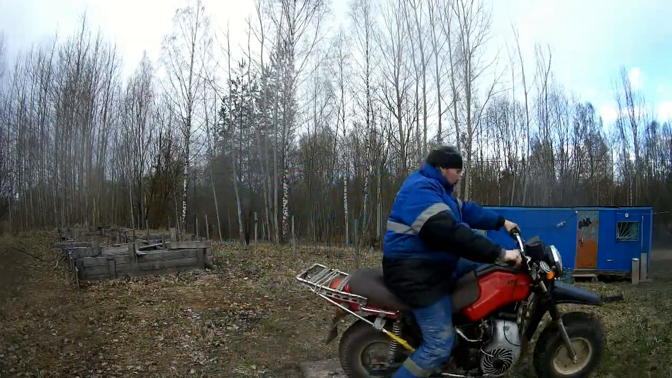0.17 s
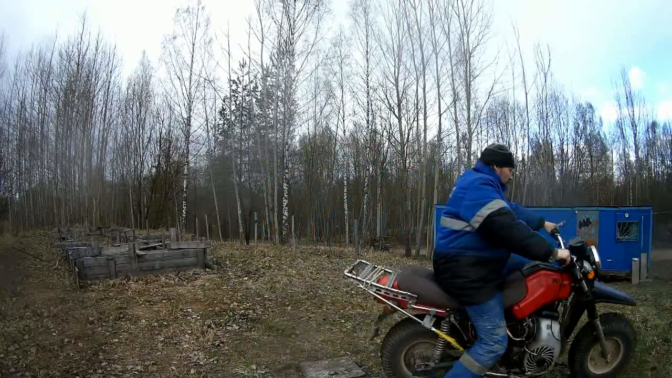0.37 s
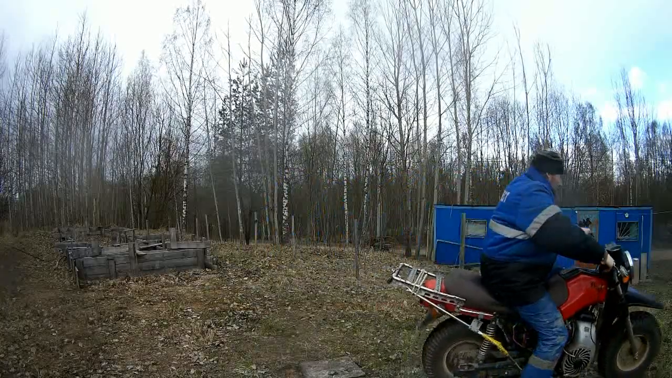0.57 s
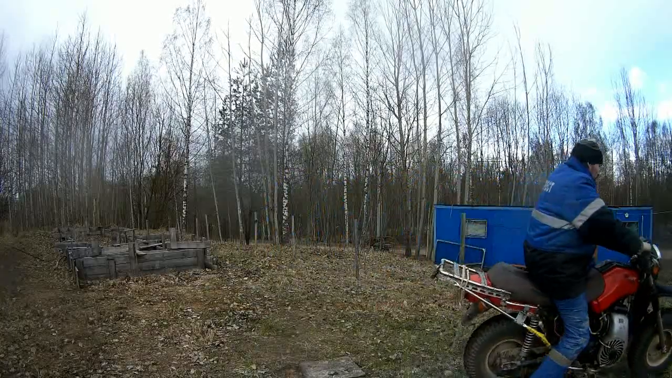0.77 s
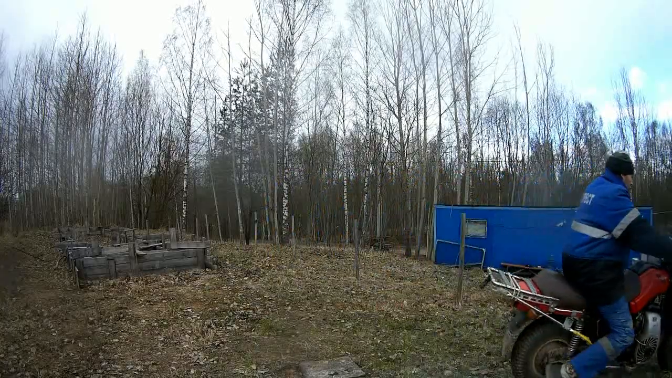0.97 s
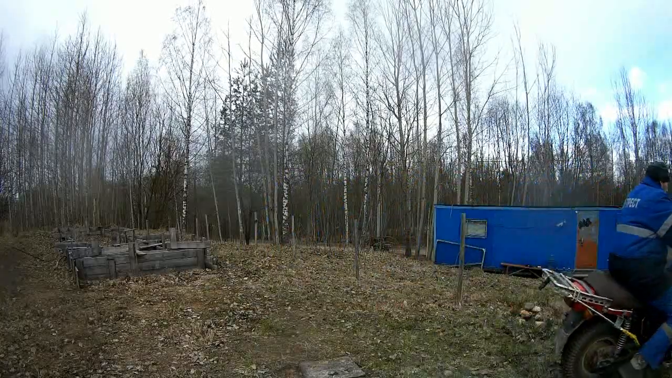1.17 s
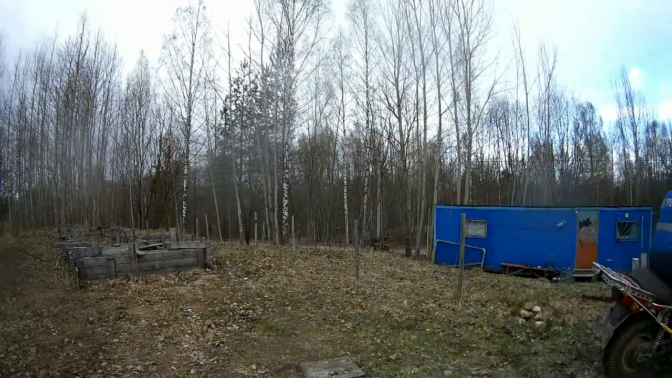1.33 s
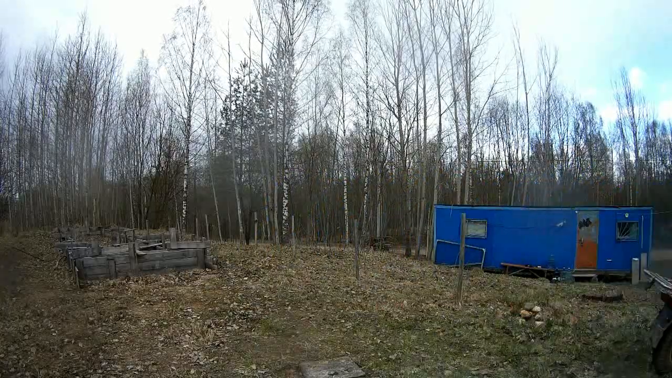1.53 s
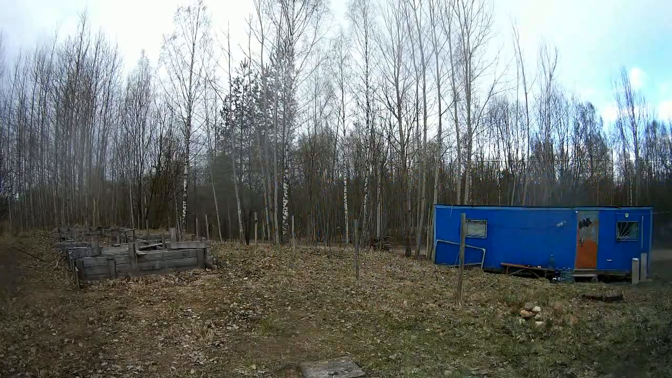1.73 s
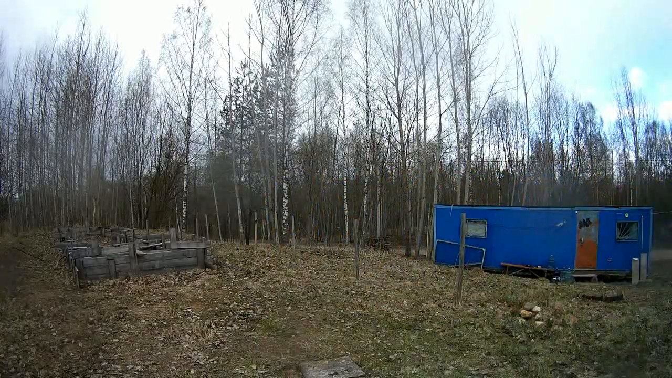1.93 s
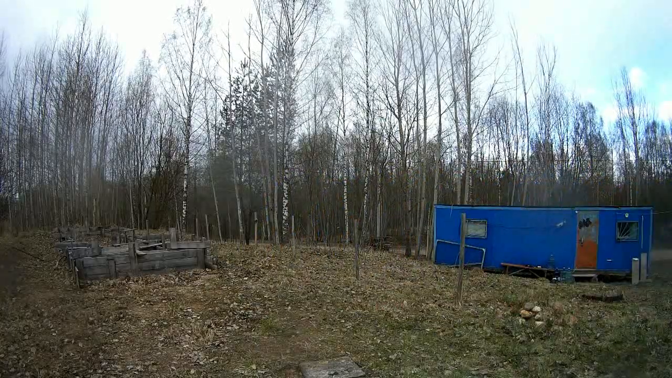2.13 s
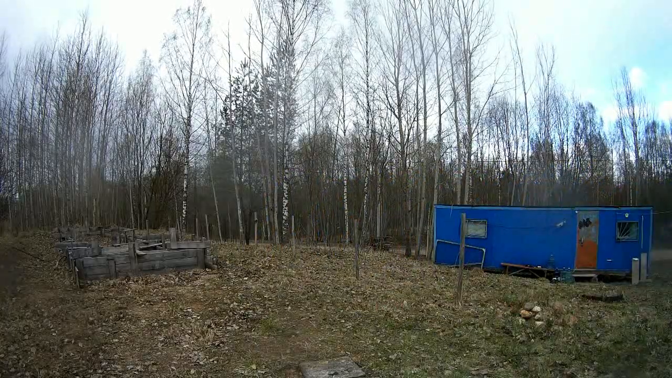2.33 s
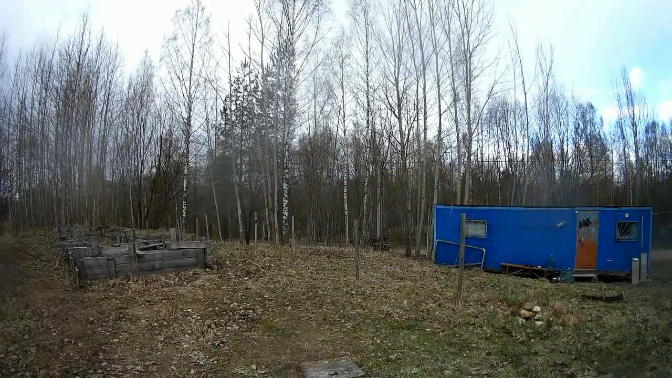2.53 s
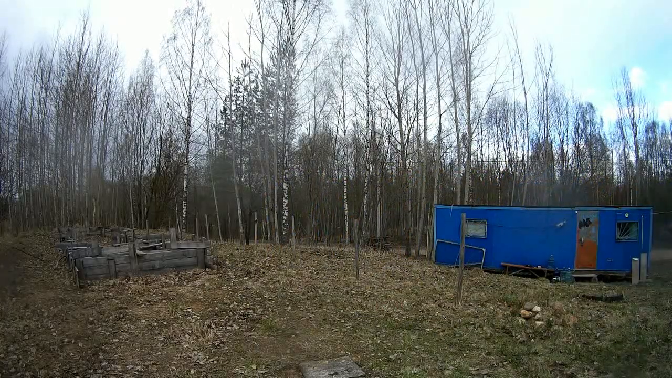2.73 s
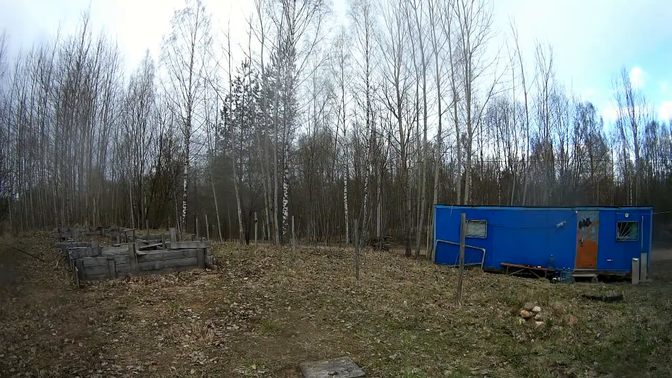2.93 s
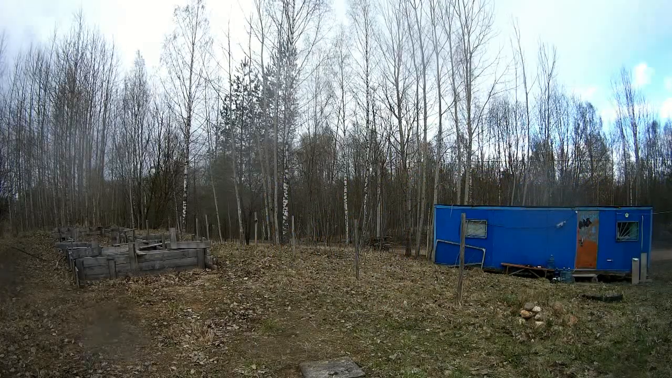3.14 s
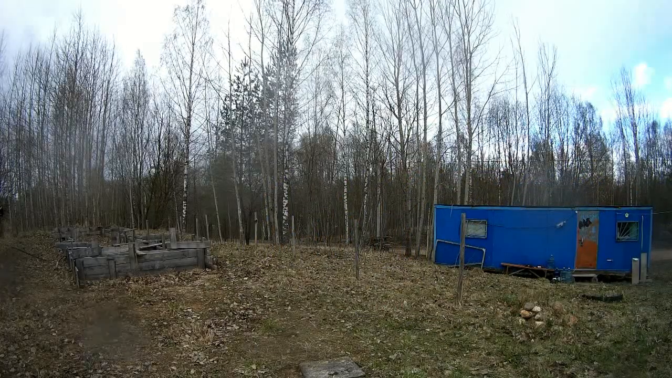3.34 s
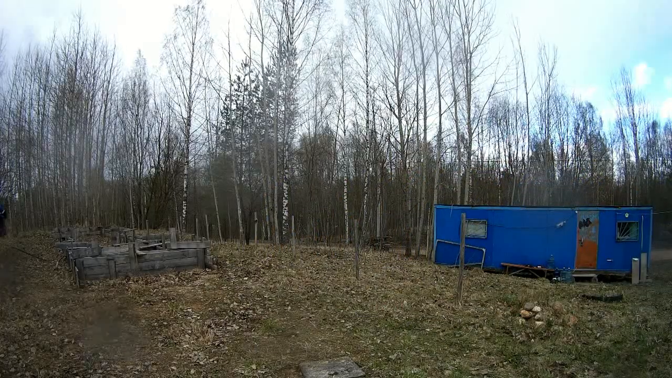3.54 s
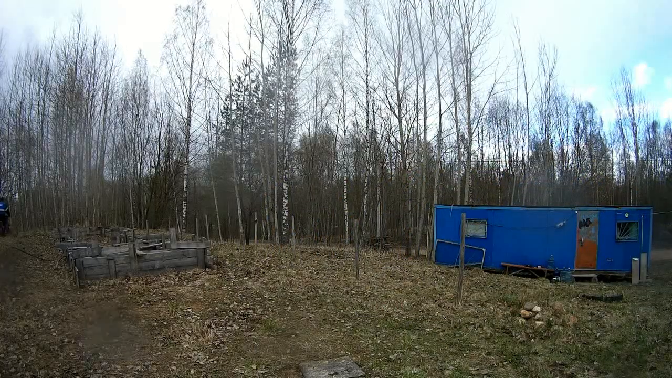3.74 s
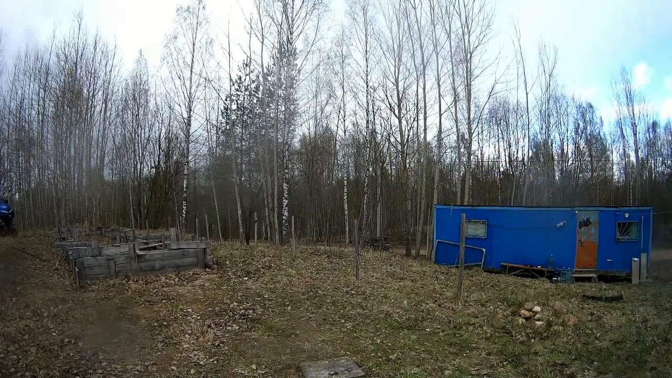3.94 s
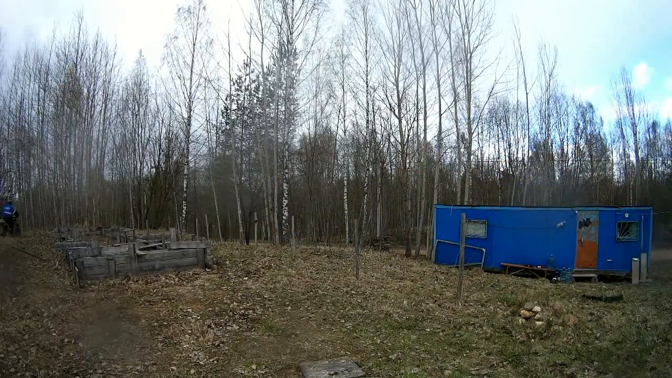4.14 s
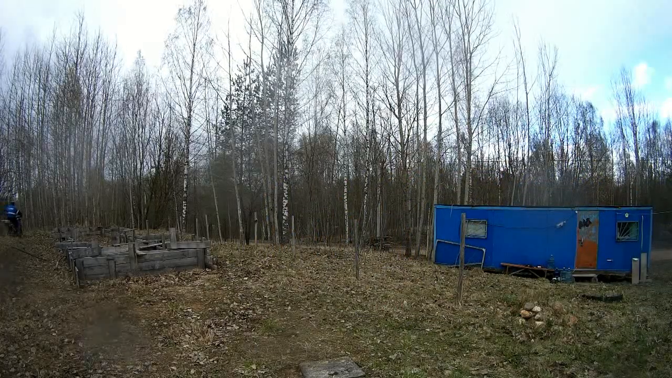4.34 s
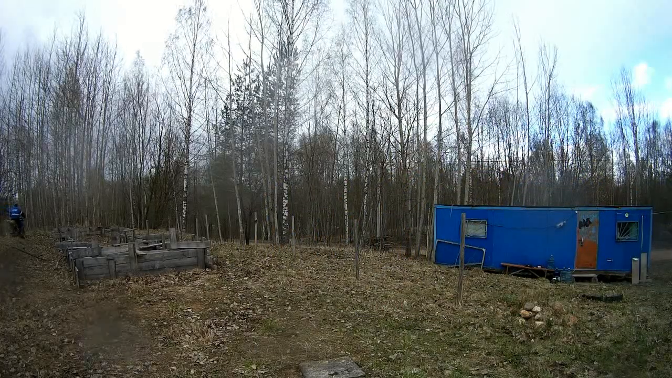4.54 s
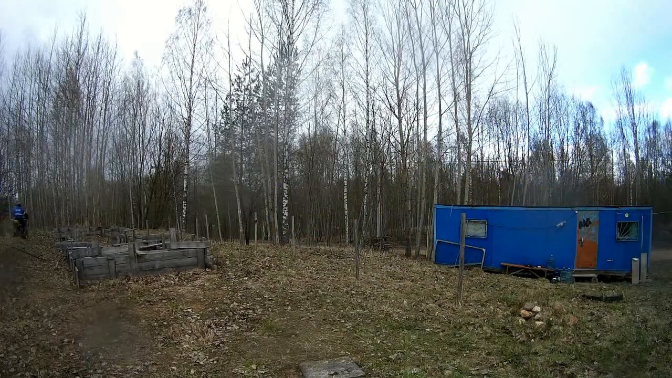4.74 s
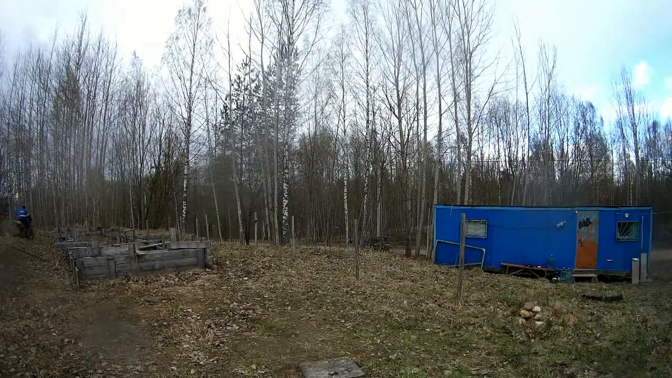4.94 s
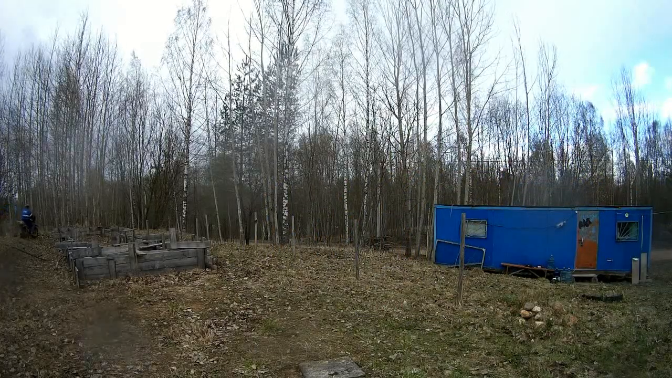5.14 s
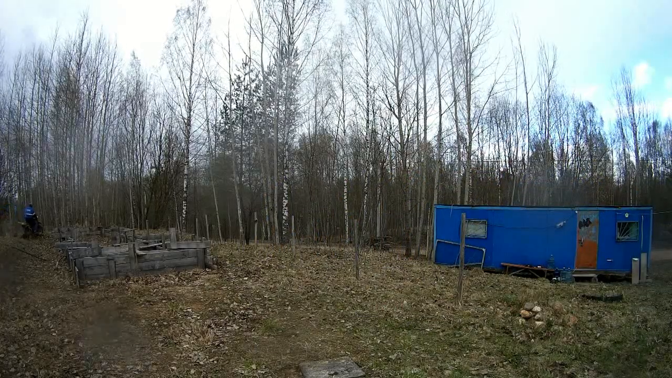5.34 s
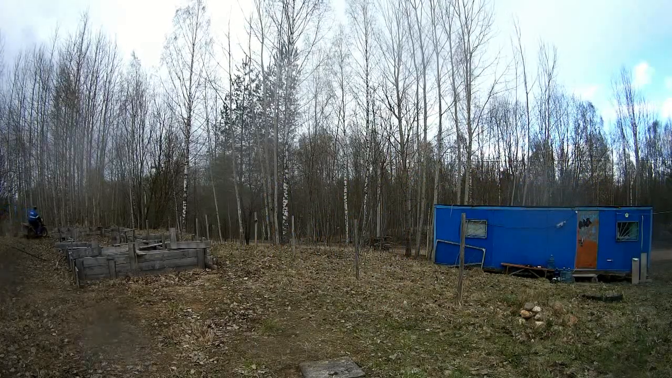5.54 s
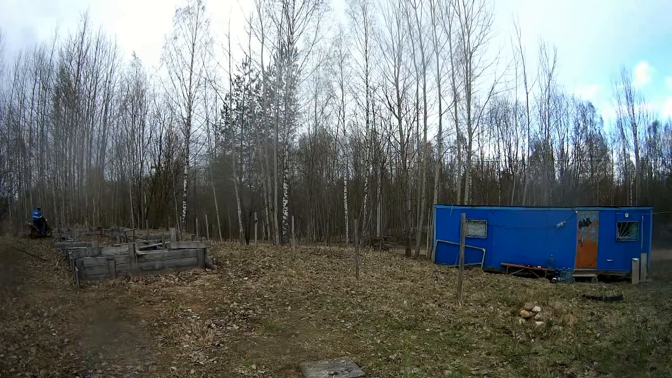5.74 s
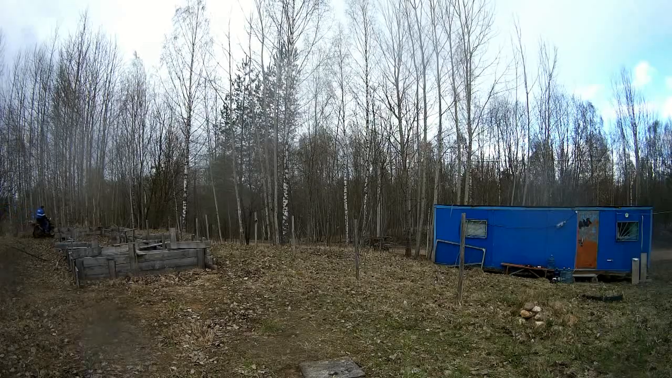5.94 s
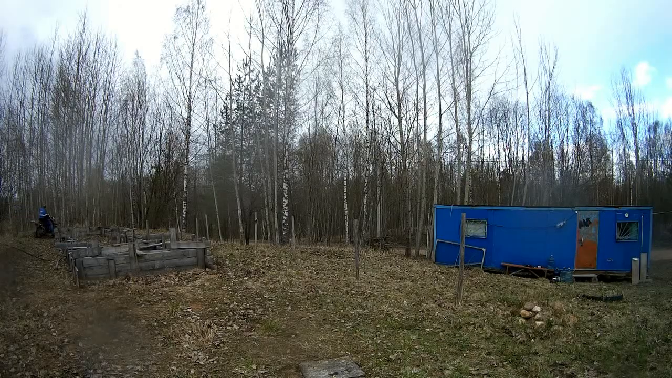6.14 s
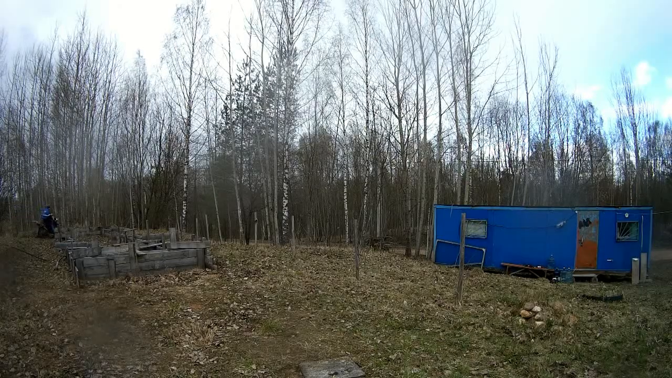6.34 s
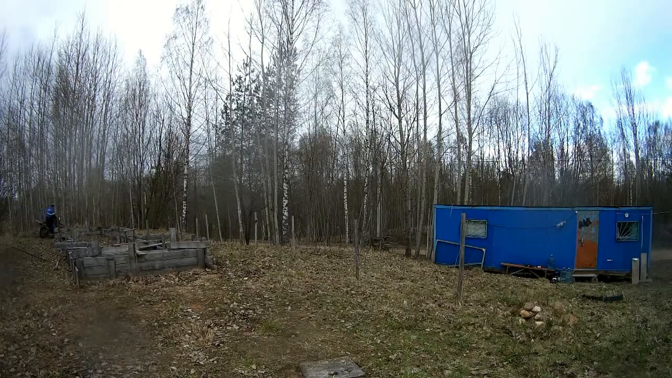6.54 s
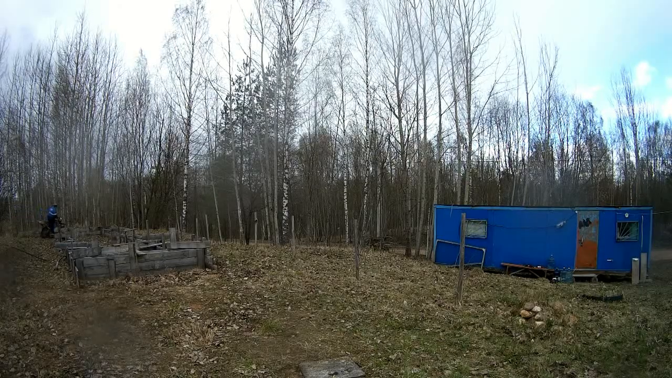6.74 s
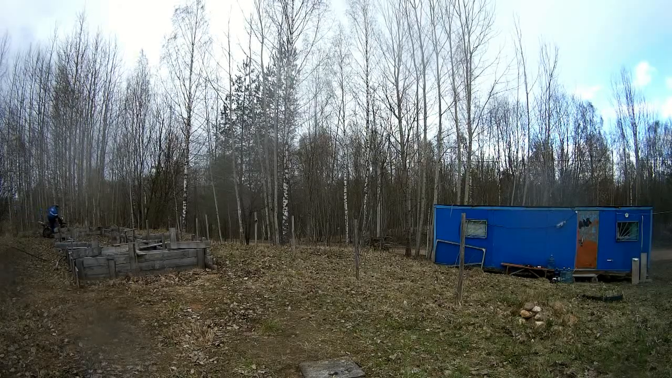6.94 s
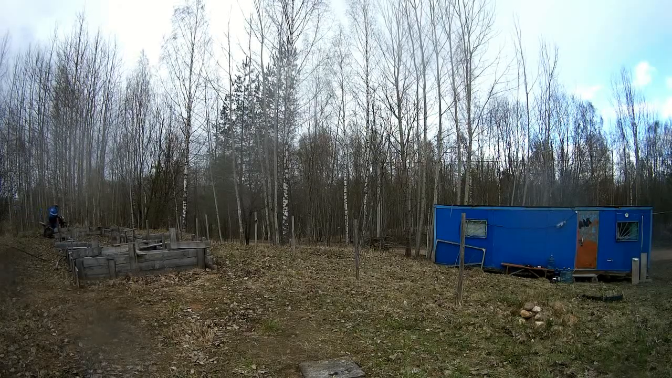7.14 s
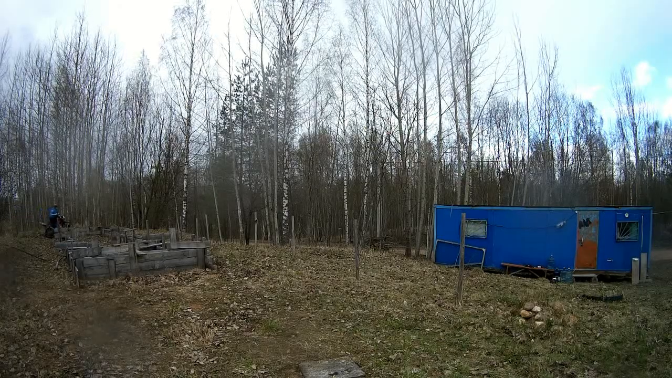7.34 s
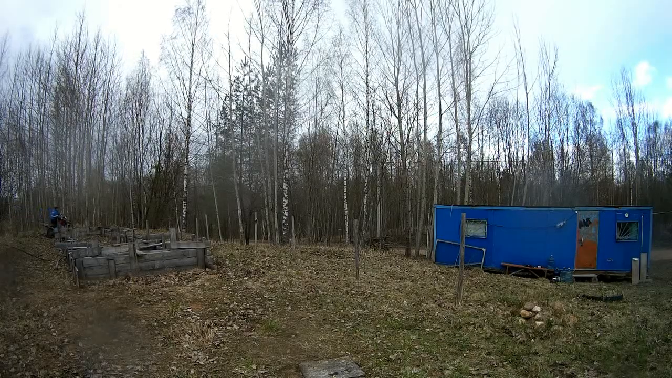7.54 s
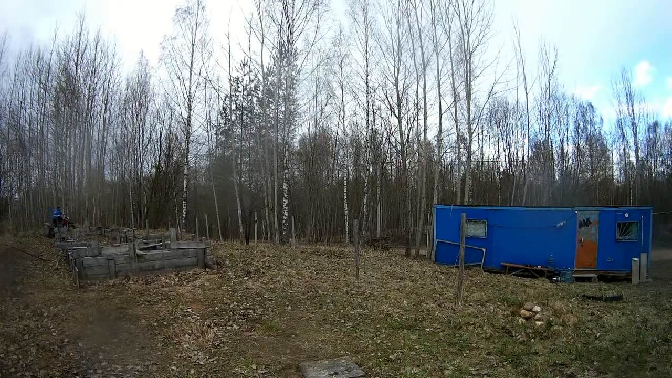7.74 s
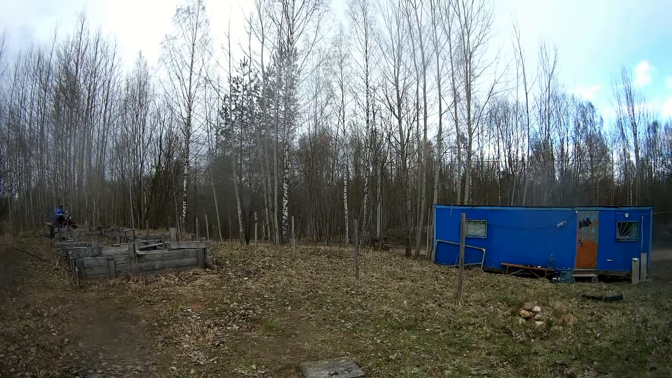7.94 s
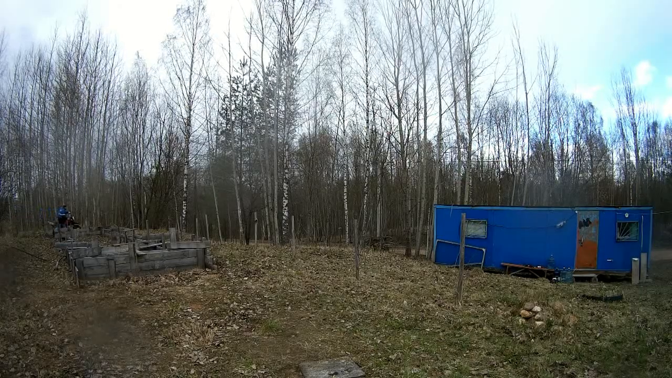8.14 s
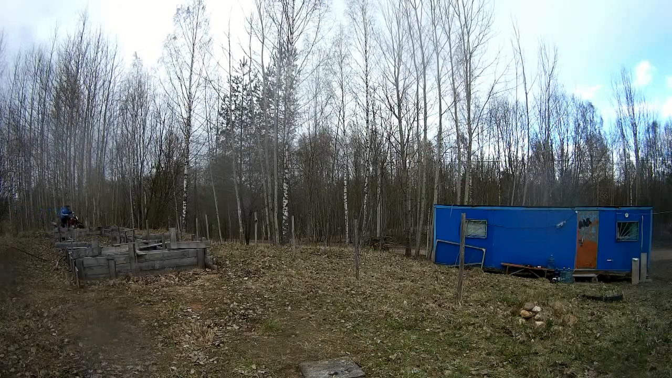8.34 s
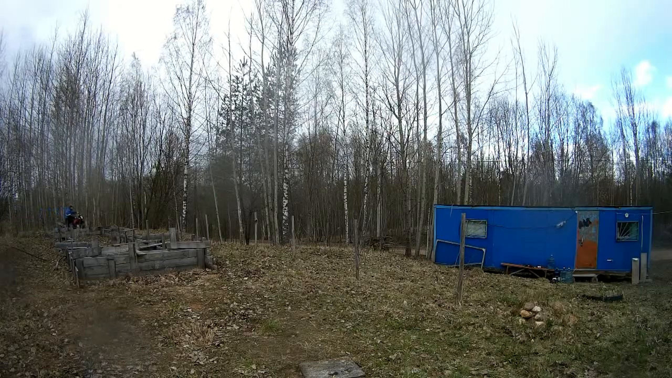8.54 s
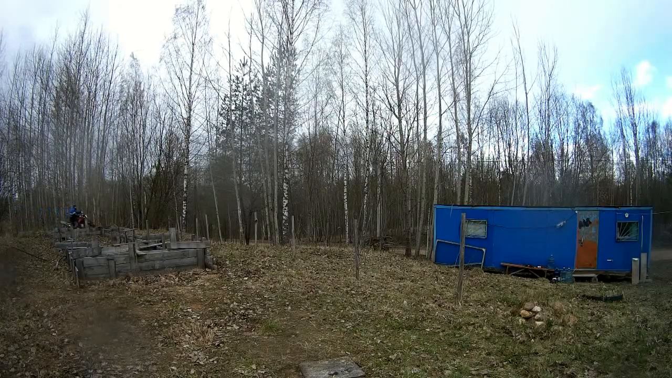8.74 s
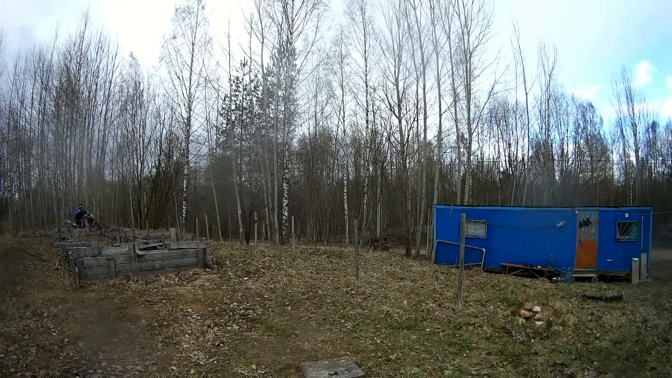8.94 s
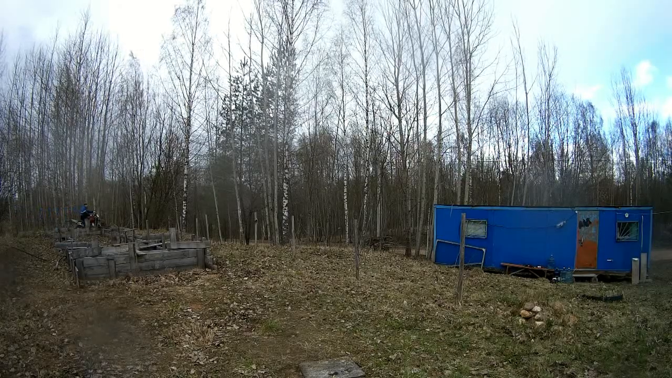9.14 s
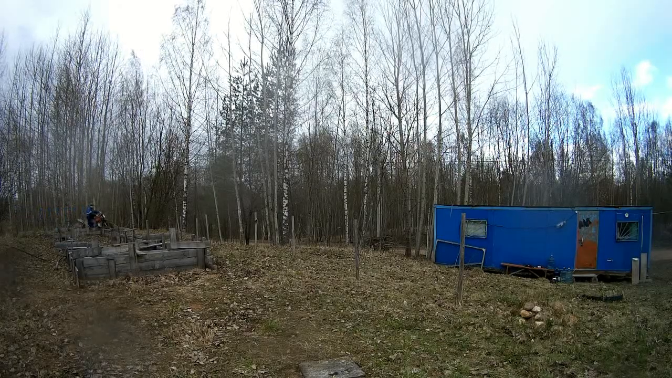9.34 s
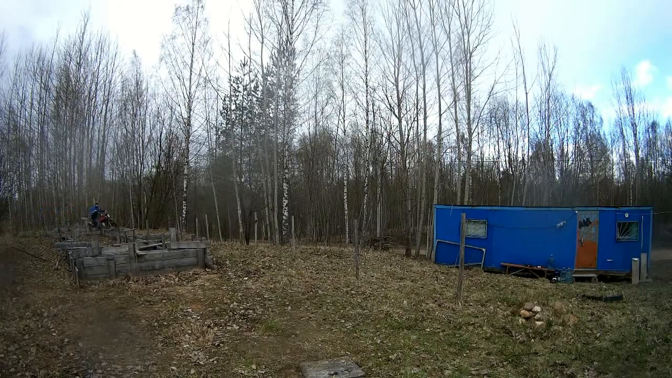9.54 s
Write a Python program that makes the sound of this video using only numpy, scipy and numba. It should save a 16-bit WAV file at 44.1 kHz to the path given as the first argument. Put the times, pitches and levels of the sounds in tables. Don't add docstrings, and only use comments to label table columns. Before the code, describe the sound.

From 0 s a small two-stroke motorcycle is loud and close, its fast raspy exhaust beat mixed with metallic clatter, intake gulps and tiny overload cracks. Around 0.55 s the throttle shuts: a clean humming note near 300 Hz throbs and fades by 1 s over scattered pops and chain slaps. A steady buzz returns from 1 to 2 s, slightly quieter, then sputters with spaced pops until 2.6 s and picks up again. At 3.16 s the sound cuts abruptly to a distant, much fainter engine, popping irregularly with thin pipe ringing. Deep wind buffets the microphone, strongest near 4.2 s and lumpy afterwards; dry twigs snap at 3.9, 5.4 and 5.8 s. From 6 s the engine fires more evenly, revs up by 7.2 s into a higher steady buzz, swells around 8.6 s, then slows and sputters from 9 s. Soft tree reflections and recorder hiss remain to about 9.7 s.

```python
import sys
import numpy as np
from scipy import signal
from scipy.fft import rfft, irfft, next_fast_len
from scipy.io import wavfile
from scipy.ndimage import uniform_filter1d, minimum_filter1d
from numba import njit

SR = 44100
rng = np.random.default_rng(int(sys.argv[2]) if len(sys.argv) > 2 else 0)


def invert_db(level):
    return 10 ** (np.asarray(level, dtype=float) / 20)


def to_wav(sig):
    pcm = np.clip(np.atleast_2d(sig), -1, 1) * 32767
    pcm = np.round(pcm).astype(np.int16)
    wavfile.write(sys.argv[1], SR, pcm.T)


N = 427769
TIME = np.arange(N) / SR


def rms_one(x):
    return x / np.sqrt(np.mean(x ** 2) + 1e-20)


def in_time(rows):
    s, *columns = np.transpose(rows)
    return [np.interp(TIME, s, column) for column in columns]


def moment(s, span_s):
    return np.exp(-((TIME - s) / span_s) ** 2)


def coloured(spectrum):
    hz, db = np.transpose(spectrum)
    size = next_fast_len(N)
    log_hz = np.log(np.arange(size // 2 + 1) * SR / size + 1)
    gain = invert_db(np.interp(log_hz, np.log(hz), db, left=-90, right=-90))
    return rms_one(irfft(rfft(rng.standard_normal(size)) * gain, size)[:N])


def drift(rate_hz):
    slow = signal.butter(2, rate_hz, fs=SR, output="sos")
    return rms_one(signal.sosfilt(slow, rng.standard_normal(N + SR))[SR:])


def evened(x, seconds):
    size = int(seconds * SR)
    power = uniform_filter1d(uniform_filter1d(x ** 2, size), size)
    return x / np.sqrt(power + 1e-12)


def bursts(rows):
    out = np.zeros(N + SR)
    t = np.arange(SR // 10) / SR
    for s, db, hz, width, length in rows:
        burst = rng.standard_normal(len(t)) * np.exp(-(t / length) ** 4)
        edges = [max(hz - width / 2, 200), hz + width / 2]
        band = signal.butter(2, edges, "band", fs=SR, output="sos")
        burst = signal.sosfilt(band, signal.sosfilt(band, burst))
        start = int(s * SR)
        out[start:start + len(t)] += invert_db(db) * burst / np.abs(burst).max()
    return out[:N]


# frequency in Hz, density in dB per Hz.
HISS_COLOUR = [(1120, -57.5), (1900, -28.5), (2000, -11.5), (2520, 9), (2730, 6.5), (4120, 7.5), (6130, 1),
               (8560, -7), (13100, -2.5), (14500, -3), (15600, -15)]


def hiss():
    return invert_db(-54.5) * coloured(HISS_COLOUR)


# time in seconds, strength in dB.
WIND_STRENGTH = [
    (0, -25.5),
    (3.155, -52),
    (3.2, -27),
    (4.2, -21),
    (5.1, -24.5),
    (5.75, -28),
    (6.9, -26),
    (7.7, -25.5),
    (8.3, -30),
    (9.7, -29.5),
]
# time in seconds, level over the wind in dB.
EDDY_HITS = [(3.21, 3), (3.53, 6), (3.75, -4), (3.84, 6), (4.19, -2), (4.44, 6.5), (4.63, -3), (4.8, -6),
             (5.01, 8.5), (5.26, 4), (5.7, 4), (5.85, 11), (5.96, 9), (6.16, 10.5), (6.35, 8.5), (6.5, 9.5),
             (6.72, 10.5), (6.99, 0.5), (7.08, 11), (7.29, 6), (7.57, 10), (7.72, 7.5), (7.92, 3.5),
             (8.21, 7), (8.531, 4.5), (8.92, 3.5), (9.09, 11), (9.19, 10), (9.33, 8)]
# time in seconds, change in dB.
FLUTTER_SURGES = [(3.301, -1.5), (3.48, 5.5), (3.57, 2.5), (4.05, 1.5), (4.36, -0.5), (4.55, -2.5),
                  (5.03, 4.5), (5.16, -11), (5.26, 1.5), (5.35, 9), (5.49, 1.5), (5.6, 8.5), (5.78, 1.5),
                  (6.1, -0.5), (6.3, 1.5), (6.9, 6.5), (7.45, 5), (9.1, 7)]
# frequency in Hz, density in dB per Hz.
RUMBLE_COLOUR = [(18, -20.5), (35, 1), (60, 4.5), (110, -7.5), (200, -22.5), (400, -50)]
# frequency in Hz, density in dB per Hz.
FLUTTER_COLOUR = [(90, -9), (200, 1.5), (330, -3), (450, -16.5), (800, -20), (1300, -28), (1900, -48)]


def wind():
    wind_db, = in_time(WIND_STRENGTH)
    eddy_db = sum(db * moment(s, .036) for s, db in EDDY_HITS)
    surge_db = sum(db * moment(s, .06) for s, db in FLUTTER_SURGES)
    rumble = evened(coloured(RUMBLE_COLOUR), .06) * invert_db(1.5 * drift(9))
    flutter = evened(coloured(FLUTTER_COLOUR), .1) * invert_db(3.1 * drift(8.5) + .29 * drift(43))
    rumble_db = wind_db + .5 + eddy_db
    flutter_db = 2 + 1.72 * (wind_db + 24.5) - 25 + .26 * eddy_db + surge_db
    return invert_db(rumble_db) * rms_one(rumble) + invert_db(flutter_db) * rms_one(flutter)


# start in seconds, peak in dB, centre in Hz, width in Hz, length in seconds.
TWIG_SNAPS = [(1.5, -39, 3300, 1500, .003), (3.326, -39, 3000, 1500, .004), (3.903, -31, 2980, 3000, .052),
              (3.921, -19, 1110, 590, 0.031), (3.966, -42, 2800, 2400, 0.054),
              (4.024, -42, 3200, 1500, .004), (4.093, -41, 3000, 3000, 0.0081),
              (5.13, -40, 2600, 1500, 0.0043), (5.352, -36, 1700, 500, .008),
              (5.399, -29, 3600, 1400, 0.002), (5.454, -39, 2900, 2200, .012),
              (5.631, -31, 3500, 2000, 0.002), (5.796, -18, 1100, 600, 0.0033),
              (5.796, -36, 3600, 2800, .002), (5.828, -33, 1500, 1400, .003),
              (6.124, -39, 3500, 1200, .003), (6.388, -42, 3500, 1500, .003),
              (6.563, -34, 3900, 1200, 0.002), (6.563, -28, 1500, 1600, .002),
              (6.635, -41, 3600, 2400, .004), (6.713, -43, 2900, 1200, .03), (6.908, -41, 3600, 2400, .005),
              (6.98, -39, 3500, 700, 0.003), (7.014, -39, 3400, 800, .003), (7.038, -27, 1200, 1300, 0.002),
              (7.175, -38, 3700, 800, .003), (8.337, -40, 3300, 1200, .004), (8.989, -43, 3500, 1200, .003),
              (9.482, -42, 3600, 1200, .003)]


def twigs():
    return bursts(TWIG_SNAPS)


# start in seconds, peak in dB.
CAPSULE_CRACKS = [
    (.0095, -34),
    (.0332, -31),
    (.057, -29),
    (.131, -36),
    (.157, -31),
    (.1828, -30),
    (.2102, -32),
    (.2375, -30),
]


def capsule_cracks():
    return bursts([(s, db, 7000, 11000, .0004) for s, db in CAPSULE_CRACKS])


# start in seconds, peak in dB.
CHAIN_SLAPS = [(.575, -45), (.612, -38), (.715, -41), (.828, -35), (0.901, -42), (2.154, -42),
               (2.236, -38.5), (2.327, -44), (2.417, -43), (2.52, -43), (2.73, -44)]


def chain_slaps():
    return bursts([(s, db, 4740, 4200, .022) for s, db in CHAIN_SLAPS])


@njit
def resonate(x, turn, r):
    out = np.zeros(len(x))
    for i in range(2, len(x)):
        out[i] = np.sin(turn[i]) * x[i - 1] + 2 * r * np.cos(turn[i]) * out[i - 1] - r * r * out[i - 2]
    return out


def twice(x, hz, width):
    turn = 2 * np.pi * hz / SR + np.zeros(N)
    r = np.exp(-np.pi * width / SR)
    return resonate(resonate(x + 1e-18, turn, r), turn, r) * np.e * 2 * (1 - r)


def pipe(fired, puffed, pitch, modes, rough, gust_s):
    fall = np.exp(-1 / (gust_s * SR))
    gas = rough * np.sqrt(1 - fall ** 2) * rng.standard_normal(N)
    fired_drive = fired + gas * signal.lfilter([1], [1, -fall], fired)
    puffed_drive = puffed + 1.5 * gas * signal.lfilter([1], [1, -fall], puffed)
    out = np.zeros(N)
    for k, (hz, width, fired_db, coasting_db) in enumerate(modes):
        drive = invert_db(fired_db) * fired_drive + invert_db(coasting_db) * puffed_drive
        out += (-1) ** k * twice(drive, hz * pitch, width)
    return out


def scatter(x, t60, wet_db):
    t = np.arange(int(t60 * SR)) / SR
    tails = rng.standard_normal((2, len(t))) * invert_db(-60 * t / t60)
    tails = tails / np.sqrt(np.sum(tails[0] ** 2))
    wet = signal.fftconvolve(x[None], tails, axes=1)[:, :N]
    place = 2 * np.pi * .6 * TIME
    return x + invert_db(wet_db) * (np.cos(place) * wet[0] + np.sin(place) * wet[1])


def from_afar(x, far, order, hz, kind="low"):
    sos = signal.butter(order, hz, kind, fs=SR, output="sos")
    return x + far * (signal.sosfilt(sos, x) - x)


# time in seconds, speed in turns per second.
CRANK_SPEED = [(0, 43), (.26, 35.5), (.55, 48), (1.13, 39.2), (1.8, 40.3), (2.52, 29.8), (2.83, 37.2),
               (3.16, 38.5), (3.17, 26), (5.5, 29.5), (6.05, 22), (6.55, 36), (7.2, 38), (7.68, 48.6),
               (7.89, 46.8), (8.36, 46.5), (8.89, 41.4), (9.25, 30.2)]
# start in seconds, turns between firings.
FIRING_NEAR = [(.0085, 1), (.0565, 1), (.182, 1), (.397, 1), (.4445, 1), (.532, 4), (.614, 4), (.702, 1),
               (.725, 5), (.831, 3), (.9, 1), (1.0195, 1), (1.12, 1), (1.327, 1), (1.4305, 1), (1.5835, 1),
               (1.809, 1), (2.0165, 3), (2.103, 3), (2.188, 3), (2.2745, 3), (2.368, 3), (2.472, 3),
               (2.573, 1), (2.609, 2), (2.739, 1), (2.825, 1), (2.905, 1), (3.073, 1), (3.1495, 1)]
# start in seconds, turns between firings.
FIRING_FAR = [(3.176, 1), (3.371, 3), (3.476, 2), (3.702, 4), (4.003, 2), (4.081, 4), (4.618, 4),
              (5.022, 3), (5.11, 4), (5.249, 3), (5.578, 8), (5.89, 2), (6.056, 1), (6.202, 1), (6.354, 1),
              (6.475, 1), (6.563, 3), (6.633, 3), (6.793, 4), (6.908, 2), (7.079, 1), (7.18, 1), (8.966, 2),
              (9.018, 3), (9.192, 2), (9.26, 1), (9.557, 1)]
# time in seconds, change in dB.
STROKE_STRENGTH = [(.08, 1.5), (.105, -2), (.157, -2), (.21, -2.5), (.237, 1), (.42, 2.5), (.445, -1),
                   (.468, 2.5), (.49, 4), (.614, -2.5), (.702, -1.5), (.831, 5), (.9, 2), (.925, 2),
                   (.95, -3.5), (.975, 0), (2.103, 1.5), (2.188, 5.5), (2.275, 2.5), (2.472, 4),
                   (2.609, 0.5), (2.768, -4), (2.797, -2.5), (2.88, -3.5), (2.934, -3), (2.96, -0.5),
                   (3.476, 3.5), (3.702, -2), (5.11, -2), (5.36, -2), (5.578, -6)]


def port_openings(jitter_s, uneven_db):
    cruise = 40
    lag = int(.25 * SR)
    speed, = in_time(CRANK_SPEED)
    start_s, every = np.transpose(FIRING_NEAR + FIRING_FAR)
    start = (start_s * SR).astype(int)

    turned = np.cumsum(speed) / SR
    firings = np.maximum(np.round(np.diff(turned[start]) / every[:-1]), 1)
    whole = np.concatenate(([0], np.cumsum(firings * every[:-1])))
    turned += np.interp(np.arange(N), start, whole - turned[start])
    at = np.flatnonzero(np.diff(np.floor(turned)) > 0)
    turn = np.floor(turned[at + 1])
    row = np.maximum(np.searchsorted(whole, turn, side="right") - 1, 0)
    fires = (turn - whole[row]) % every[row] == 0
    lone = (every[row] > 1) | ~np.roll(fires, 1)

    chance = rng.standard_normal((500, 3))[:len(at)]
    ragged = np.clip((cruise - speed[at]) / 8, .1, 1)
    lone_db = -2.5 + np.clip(3.5 * chance[:, 0], -1, 1)
    strength = fires * invert_db(np.where(lone, lone_db, uneven_db * chance[:, 0]))
    for s, db in STROKE_STRENGTH:
        strength[np.argmin(np.abs(at / SR - s) + ~fires)] *= invert_db(db)

    share = np.interp(np.arange(N), at, 1 / every[row])
    share = uniform_filter1d(share, int(2 * .25 * SR), origin=lag - 1)
    heat = .945 + .06 * share + .001 * (speed - cruise)
    shift = np.where(fires, jitter_s, ragged * .0008) * SR * chance[:, 1]
    shift -= .002 * SR
    puff_db = (.8 + .6 * ragged) * chance[:, 2] + .66 * (speed[at] - cruise)
    at = np.clip(at + shift.astype(int), 0, N - 1)
    fired, puffed, popped = np.zeros((3, N))
    fired[at] = strength
    popped[at] = strength * lone
    puffed[at] = (strength == 0) * invert_db(puff_db)
    return fired, puffed, popped, heat, share


# time in seconds, pitch in Hz, level in dB.
SINGING_NOTE = [
    (0.55, 332.1, -16),
    (0.564, 329.8, -7),
    (0.722, 323.5, -14),
    (0.74, 323.6, -14),
    (0.82, 308.8, -8),
    (0.858, 320, -14.5),
    (0.884, 302.6, -7.5),
    (0.99, 304.4, -18),
    (1.0, 294.5, -17),
]


def singing():
    hz, level_db = in_time(SINGING_NOTE)
    window = np.clip(np.minimum((TIME - .55) / .012, (1.0 - TIME) / .12), 0, 1)
    phase = 2 * np.pi * np.cumsum(hz) / SR
    throb = 1 + .25 * np.cos(phase / 7) + .08 * drift(15)
    return np.sqrt(2) * invert_db(level_db - 1.5) * window * throb * np.sin(phase), window


# frequency in Hz, density in dB per Hz.
CLATTER_COLOUR = [(1000, -24.5), (1700, 0.5), (1850, -10.5), (2620, -14.5), (3160, -28), (3540, -27),
                  (4580, -22.5), (5050, -31.5), (6350, -34), (9000, -50.5), (11700, -71.5), (19800, -120)]


def clatter(fired, puffed, share):
    beat = .18 + .22 * share
    beat = beat + signal.lfilter([1], [1, -np.exp(-1 / (.008 * SR))], fired + .2 * puffed)
    rise = np.hanning(int(.003 * SR)) * 2 / (.003 * SR)
    return coloured(CLATTER_COLOUR) * signal.lfilter(rise, 1, beat)


# frequency in Hz, width in Hz, fired level in dB, coasting level in dB.
NEAR_FIN_MODES = [(4450, 380, -2, -8), (2600, 250, -7, -13), (2130, 120, -13, -18), (6100, 900, -9, -9)]
# frequency in Hz, width in Hz, fired level in dB, coasting level in dB.
FAR_FIN_MODES = [(3150, 900, -3, -8), (2130, 70, -15, -18)]


def fins(struck, puffed, far):
    near_fins = pipe(struck, puffed, 1, NEAR_FIN_MODES, rough=5, gust_s=.011)
    far_fins = pipe(struck, puffed, 1, FAR_FIN_MODES, rough=5, gust_s=.011)
    return (1 - far) * near_fins + far * far_fins


# time in seconds, span in seconds, pitch in Hz, width in Hz, level in dB.
PIPE_GLINTS = [
    (8.15, .2, 1582, 25, -11),
    (8.2, .25, 835, 30, -10),
    (8.5, .2, 1715, 40, -15),
    (3.3, .16, 1090, 55, -1),
]


def shield_and_glints(fired, popped):
    out = invert_db(-11) * moment(4.75, .6) * twice(popped, 2516, 30)
    for s, span_s, hz, width, db in PIPE_GLINTS:
        out += invert_db(db) * moment(s, span_s) * twice(fired, hz, width)
    return out


def intake(fired, puffed):
    gulps = np.roll(fired, int(.012 * SR))
    return pipe(gulps, puffed, 1, [(820, 150, 0, -20)], rough=.6, gust_s=.006)


# time in seconds, pitch in Hz.
BELL_PITCH = [(0, 1120), (.5, 1140), (1.25, 1120), (1.7, 1155), (2, 1125), (2.3, 1095), (2.55, 1050),
              (2.75, 1068), (3, 1130), (3.17, 1090), (6, 1065), (6.4, 1090), (7.4, 1135), (8.2, 1125),
              (8.6, 1165), (9, 1142), (9.3, 1110), (9.7, 1130)]


def bell(struck, puffed):
    pitch, = in_time(BELL_PITCH)
    tone = pipe(struck, puffed, pitch, [(1, 64, 0, -10)], rough=.12, gust_s=.006)
    return scatter(tone, .15, -8)


def baffles(x):
    reply = signal.unit_impulse(SR // 25)
    for lag_s in (.0007, .0013, .0023):
        ends = np.zeros(int(lag_s * SR) + 1)
        ends[[0, -1]] = .68, 1
        reply = signal.lfilter(ends, ends[::-1], reply)
    return signal.oaconvolve(x, reply)[:N]


# frequency in Hz, width in Hz, fired level in dB, coasting level in dB.
RING_MODES = [(856, 380, -5, -14), (939, 147, -4.5, -14.5), (1175, 370, -5, -13.5),
              (1576, 60, -28.5, -35.5), (1474, 860, -16, -19), (1682, 260, -17, -36.5)]


def ring(fired, puffed, popped, heat, far):
    pitch = heat * (1 + .025 * drift(3.5))
    rough = .34 - .15 * far
    out = pipe(fired - .5 * popped, puffed * (1 + .6 * far), pitch, RING_MODES, rough, gust_s=.016)
    baffle_stop = signal.cheby1(4, 1, 1830, fs=SR, output="sos")
    out = signal.sosfilt(baffle_stop, baffles(out))
    out = from_afar(out, far, 2, 670, "high")
    return scatter(out, .22, 4 * far + 1)


# frequency in Hz, width in Hz, fired level in dB, coasting level in dB.
THUD_MODES = [(309.3, 33.4, -12, -5.5), (529, 110, -25, -25), (277, 170, -28.5, -6.5)]


def thud(fired, puffed, slug, sings, share, far):
    blowdown_hz = 300
    out = twice(fired, blowdown_hz * slug, 175)
    out += pipe(fired, puffed * invert_db(-16 * sings), slug, THUD_MODES, rough=.08, gust_s=.01)
    out = signal.lfilter(*signal.iirpeak(blowdown_hz, blowdown_hz / 330, fs=SR), out)
    out = from_afar(out, far, 4, 385)
    out += invert_db(-11.5) * np.roll(out, int(.012 * SR))
    return scatter(out, .3, 4 * far - 10 + 11 * (1 - share))


# frequency in Hz, width in Hz, fired level in dB, coasting level in dB.
BOOM_MODES = [(53, 100, 0.5, -35), (171.2, 80, 1, 1), (145.5, 40, -14, -3)]


def boom(fired, puffed, popped, slug, sings, far):
    out = pipe(fired + .51 * popped, puffed * invert_db(-14 * sings), slug, BOOM_MODES, rough=.06, gust_s=.01)
    return scatter(from_afar(out, far, 4, 250), .3, 4 * far - 8)


# time in seconds, level in dB, aim of the silencer (1 belly toward us, -1 away).
ENGINE_HEARD = [(0, -18, 0.39), (.3, -17.5, 0.37), (.7, -20.5, 0.96), (1.15, -21.5, 0.42),
                (1.9, -23.5, 0.55), (2.4, -23, 0.62), (3.155, -20.5, 0.39), (3.165, -36, 1),
                (3.8, -40, 0.95), (5.3, -40.5, 0.98), (5.8, -41, 0.91), (6.5, -31.5, 0.69),
                (6.85, -34, 0.59), (7.3, -29.5, 0.54), (8.42, -28, 0.26), (8.6, -26, -0.011),
                (9.15, -34, -0.2), (9.7, -33, -1.53)]
# time in seconds, factor.
SLUG_STRETCH = [(0, 1.03), (.33, 0.95), (.5, 0.97), (.58, 0.97), (.9, 0.965), (1.2, 1.047), (1.85, 1.012),
                (2.4, 0.931), (2.7, 0.919), (3.155, 0.975), (3.17, 0.97), (7, 1.028), (8.3, 1.035),
                (9.7, 1.102)]
# time in seconds, change of boom in dB.
ENGINE_LOAD = [(0, -3.5), (.5, -8.5), (.6, -3), (.9, 1.5), (1.1, -4), (1.9, -3), (2.1, 2), (2.45, -1),
               (2.8, -4.5), (3.15, -3), (3.3, -6), (5, 7), (7, -3), (8.1, -10), (8.6, 1.5), (9.3, 8),
               (9.7, -0.5)]


def engine():
    level_db, aim = in_time(ENGINE_HEARD)
    load_db, = in_time(ENGINE_LOAD)
    slug, = in_time(SLUG_STRETCH)
    far = np.clip((TIME - 3.16) * 200 + .5, 0, 1)
    away = np.maximum(-aim, 0)
    fired, puffed, popped, heat, share = port_openings(jitter_s=.00006, uneven_db=.8)
    song, sings = singing()
    slug = slug * heat ** far * (1 + .06 * (1 - share) * drift(9))
    struck = fired + invert_db(7.5) * popped

    boom_db = .24 + load_db + 2.5 * (1 - share) - 3.5 * aim
    thud_db = 14.5 * aim - 8 * sings
    ring_db = 2.5 * away - 2
    bell_db = -5 + .5 * far + 5.5 * away
    clatter_db = -19.5 + 2.5 * far + 9 * np.exp(-TIME / .73)
    fins_db = clatter_db - 26.5 + 16 * far
    intake_db = -7 - 5.5 * TIME
    layers = [
        (boom_db, boom(fired, puffed, popped, slug, sings, far)),
        (thud_db, thud(fired, puffed, slug, sings, share, far)),
        (ring_db, ring(fired, puffed, popped, heat, far)),
        (bell_db, bell(struck, puffed)),
        (clatter_db, clatter(fired, puffed, share)),
        (fins_db, fins(struck, puffed, far)),
        (intake_db, intake(fired, puffed)),
    ]
    machine = shield_and_glints(fired, popped)
    for db, layer in layers:
        machine = machine + invert_db(db) * evened(layer, .25)
    direct = invert_db(level_db) * machine
    echo = signal.lfilter(*signal.iirpeak(523, 523 / 435, fs=SR), direct)
    return song + direct - .56 * far * echo


def scene():
    mix = hiss() + wind() + twigs() + capsule_cracks() + chain_slaps() + engine()
    return mix[None]


def low_pass(x):
    return signal.sosfilt(signal.butter(12, 15720, fs=SR, output="sos"), x)


def record(dry):
    dry = signal.sosfilt(signal.butter(2, 28, "high", fs=SR, output="sos"), dry)
    ride = int(.004 * SR)
    top = np.where(TIME < int(.25 * SR) / SR, 1.2, .8)
    gain = np.minimum(top / (np.abs(dry) + 1e-9), 1)
    gain = minimum_filter1d(gain, 2 * ride)
    gain = uniform_filter1d(uniform_filter1d(gain, ride), ride)
    mix = np.clip(dry * gain, -.95, .95)
    return low_pass(mix)


dry = scene()
out = record(dry)
to_wav(out)
```